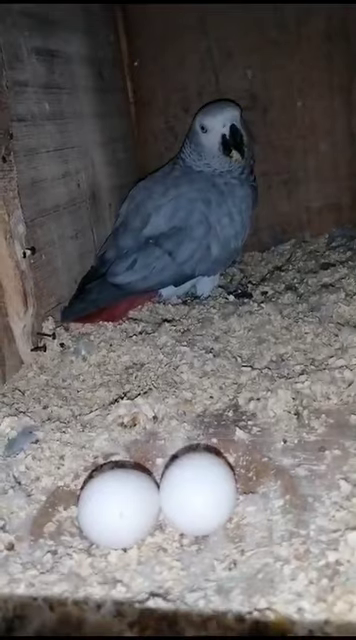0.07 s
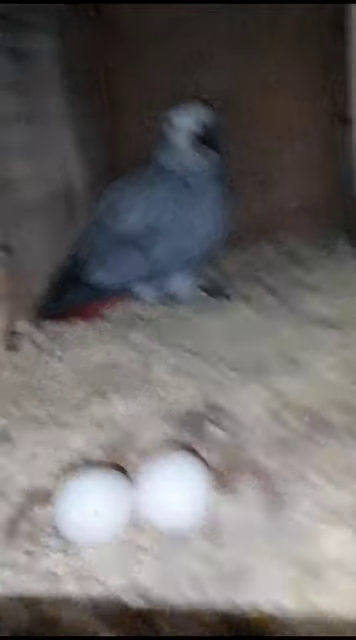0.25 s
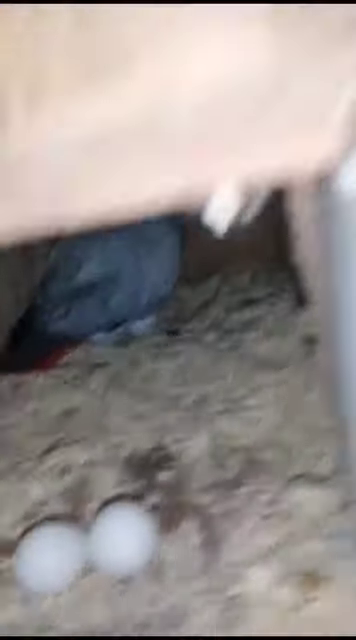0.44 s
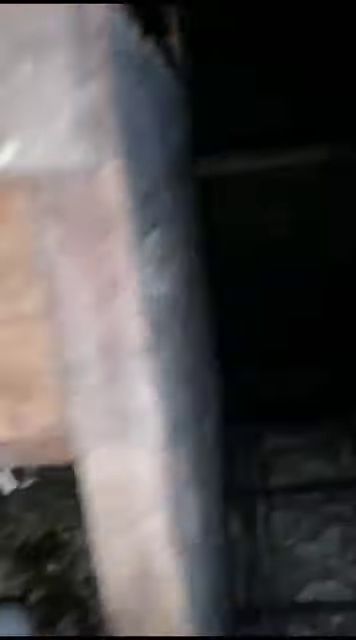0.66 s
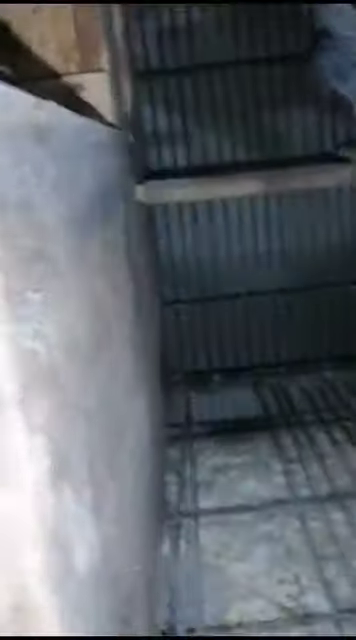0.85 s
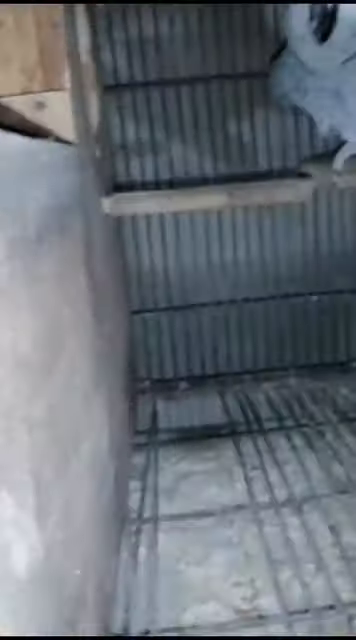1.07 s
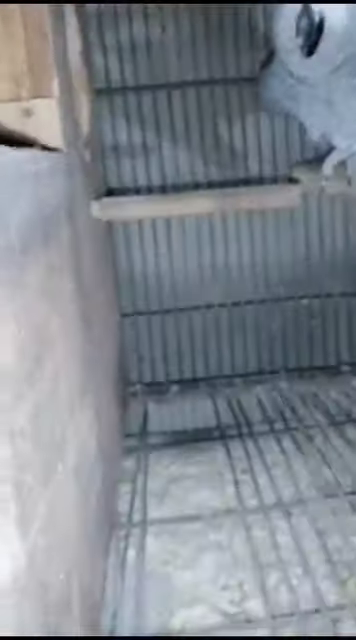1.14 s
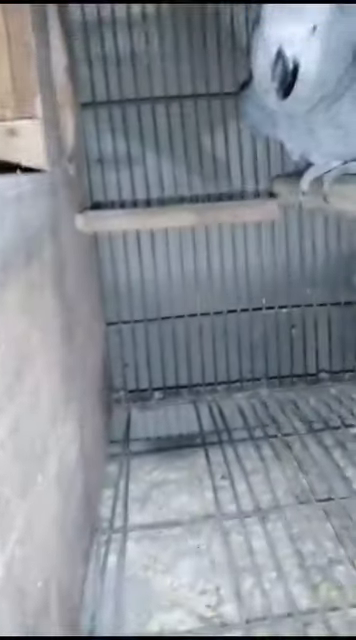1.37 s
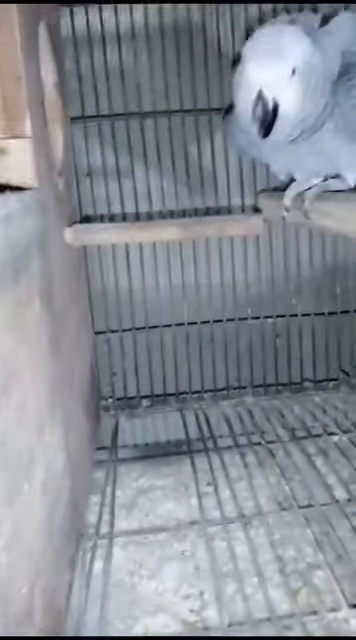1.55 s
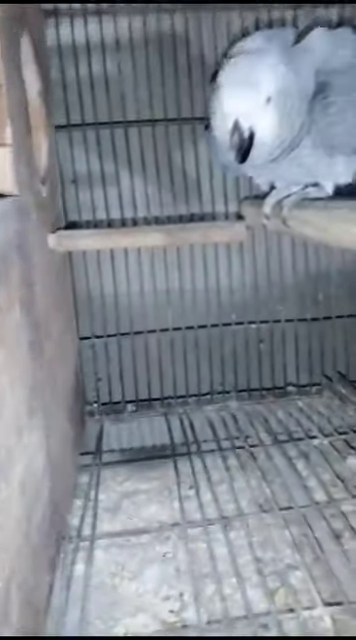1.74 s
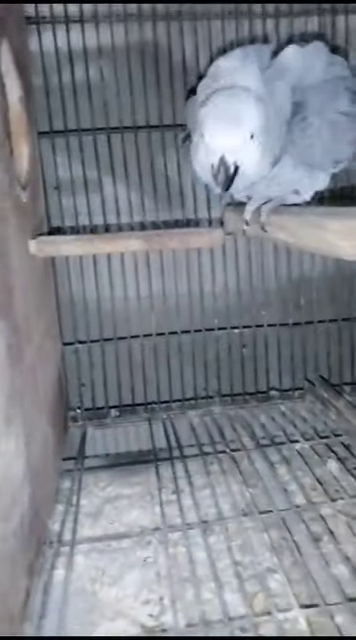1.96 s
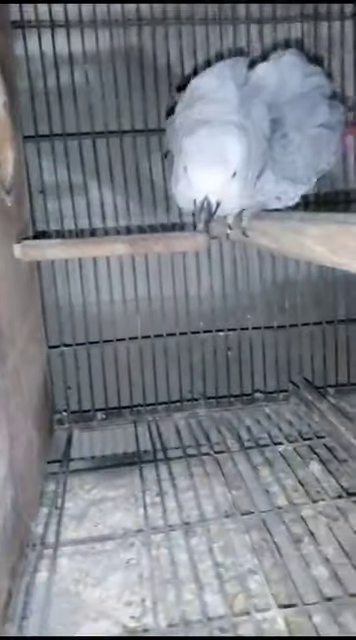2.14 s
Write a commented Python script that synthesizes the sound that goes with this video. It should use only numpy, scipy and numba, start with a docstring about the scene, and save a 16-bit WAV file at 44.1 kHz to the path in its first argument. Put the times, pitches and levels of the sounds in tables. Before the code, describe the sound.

A grey parrot growls once, close to the microphone in a small indoor aviary. A soft buzz breaks into a long harsh rasp and ends in a low rattling croak, with slight echo and a faint hum.

```python
"""A grey parrot growls once in a small indoor aviary, close to a hand-held phone.
A soft buzz breaks into a long harsh rasp and ends in a low rattling croak.
Uneven syrinx pulses ring the throat, at times in clear tones, while air tears through it.
Cage walls echo the call over a faint hum."""
import sys
import numpy as np
from scipy import signal
from scipy.fft import rfft, irfft
from scipy.io import wavfile
from scipy.ndimage import uniform_filter1d, map_coordinates
from numba import njit

SR = 44100
rng = np.random.default_rng(int(sys.argv[2]) if len(sys.argv) > 2 else 0)


def transcribe(u):
    """Save the signal u as a 16-bit wav file named by the first command-line argument.

    u: samples, shape (n,) or (channels, n), limited to [-1, 1]; the rate is SR.
    q: integer samples, one column per channel.
    """
    v = np.clip(np.atleast_2d(u).T, -1, 1)
    q = np.round(v * 32767).astype(np.int16)
    wavfile.write(sys.argv[1], SR, q)


N = 97020


def growl(start_s=.17, attack_s=.04, break_s=.218, stop_s=1.946, release_s=.007):
    """Syrinx pulses and puffs of air sound low harmonics, ring mouth and throat, and drive the rasp."""
    # Each row: time in seconds, syrinx pitch in Hz.
    pitch_hz = [(.22, 223), (.3, 231), (.32, 242.5), (.47, 258.5), (.6, 245.7), (.665, 234.5), (.8, 234),
                (.888, 229.5), (.99, 230), (1.096, 234), (1.35, 235.5), (1.72, 230.5), (1.81, 223),
                (1.84, 226)]
    # Each row: time in seconds, pulse unevenness from 0 to 1.
    roughness = [(.2, .75), (.42, .7), (.58, .65), (.7, .3), (.95, .4), (1.5, .4), (1.95, .45)]
    # Each row: time in seconds, then relative levels in dB of low harmonics, mouth, throat, rasp.
    levels = [(.16, -46, -55, -35, -62), (.205, -36, -52, -13, -33), (.22, -31, -37, -18.5, -33),
              (.275, -34, -27, -19.5, -28), (.31, -33, -23, -18, -27), (.345, -37.5, -29, -20.5, -24.5),
              (.39, -33.5, -31, -15.5, -25.5), (.53, -35, -30, -19.5, -24.5), (.56, -36.5, -30, -17, -26),
              (.635, -39, -28, -20.5, -25.5), (.68, -37, -23.5, -23.5, -25), (.78, -37, -23.5, -32.5, -25),
              (.89, -37.5, -29.5, -39, -26), (1.06, -35.5, -24.5, -29, -23.5),
              (1.35, -38.5, -27.5, -41.5, -24.5), (1.65, -40, -22.5, -31.5, -25),
              (1.8, -36, -23.5, -34, -26.5), (1.88, -35, -24.5, -27, -25.5),
              (1.945, -40.5, -32.5, -33, -26.5)]
    # Each row: frequency in Hz, gain of the low harmonics in dB.
    low_shape = [(200, -46.5), (470, -16.5), (590, -36), (685, -3.5), (780, -30), (910, 2.5), (1030, 4.5),
                 (1170, 0.5), (1290, 5), (1410, -5.5), (1640, -9), (1850, 6), (2100, -4.5), (2530, 5),
                 (2800, -0.5), (3250, -4), (4200, -16.5), (9000, -66.5)]
    # Each row: time in seconds, throat resonance in Hz.
    throat_hz = [(.22, 2062), (.32, 2100), (.48, 2196), (.62, 2114), (.9, 2090), (1.3, 2054), (1.95, 2090)]
    t, rough = np.arange(N) / SR, curve(roughness)
    low_db, mouth_db, throat_db, rasp_db = (curve(levels, k) for k in range(1, 5))
    uneven, even, phase = syrinx(curve(pitch_hz) * (1 + .005 * walk(45)), rough)
    puffs = unit((1 + np.exp(-phase)) * rng.standard_normal(N))
    drive = uneven + undb(-11) * rough * puffs
    low = unit(colour(even + undb(-16) * puffs, low_shape)) * undb(low_db + 1.6 * walk(49.66))
    mouth = resonance(drive + undb(-4) * puffs, hz=1648, width_hz=720) * undb(mouth_db - 7)
    throat = resonance(drive, curve(throat_hz), width_hz=323)
    throat *= undb(throat_db - 6.5 + .7 * walk(70.06))
    tones = clear_tones(phase)
    jet = puffs + undb(-11) * uneven + undb(-14) * even
    rasp = beak_rasp(jet) * undb(rasp_db - 1.5)
    harsh = butterworth(mouth + throat + rasp, "high", hz=1300, order=8)
    harsh *= undb(-7.5 * np.clip((break_s - t) / .0017, 0, 1))  # held down until the break
    gate = np.clip((t - start_s) / attack_s, 0, 1) * np.exp(-np.maximum(t - stop_s, 0) / release_s)
    return gate * (low + harsh + tones)


def syrinx(hz, rough, jitter_s=.000039):
    """One pulse a cycle, uneven in time and size; returns two trains and the phase in cycles."""
    t, phase = np.arange(N) / SR, np.cumsum(hz) / SR
    times = np.interp(np.arange(1, int(phase[-1])), phase, t)
    slip, strength = rng.standard_normal((1000, 2))[:len(times)].T * np.interp(times, t, rough)
    uneven = clicks(times + jitter_s * slip, undb(2 * strength))
    even = clicks(times + 1.6 * jitter_s * slip, undb(1.8 * strength))  # evener in size, looser in time
    return unit(uneven), unit(even), phase % 1


def beak_rasp(jet):
    """Air rasps and whistles through the bright resonances of throat and open beak."""
    # Each row: time in seconds, four resonance centres in Hz.
    centres_hz = [(.24, 3370, 3874, 5016, 6530), (.5, 3540, 4186, 5280, 6980),
                  (.66, 3900, 4290, 5030, 6810), (.77, 4000, 4620, 5420, 7200),
                  (.85, 3250, 4400, 5400, 7130), (1.08, 3221, 4450, 5070, 7100),
                  (1.37, 3310, 4450, 5290, 6860), (1.65, 3590, 4090, 5146, 7130),
                  (1.86, 3530, 3836, 5075, 6800)]
    # Each row: width of one resonance in Hz, its gain in dB.
    bands = [(200, -1), (220, 1), (340, 7), (380, 9)]
    # Each row: frequency in Hz, gain of the air noise in dB.
    air_shape = [(300, -74.5), (700, 15.5), (1100, -26), (1550, -0.5), (2000, 1.5), (2500, 2.5),
                 (2950, -6.5), (3350, 1), (4000, -5), (4500, 1), (5300, -1), (6100, -8), (7200, -9),
                 (8300, -17.5), (9200, -15), (10300, -26.5), (12000, -20), (13300, -29.5), (15000, -30)]
    # Each row: time in seconds, ringing of the lower three resonances in dB relative to the air noise.
    whistle_db = [(.25, -18, -14, -14), (.4, -16, -6, -9), (.6, -14, -8, -10), (.77, -20, -13, -5),
                  (.85, -7, -8, -9), (1, -9, -17, -14), (1.35, -16, -15, -4.5), (1.7, -15, -12, -8),
                  (1.9, -13, -12, -4.5)]
    air = colour(jet, air_shape)
    peaks = sum(undb(db) * svf(air, curve(centres_hz, k), float(width_hz))
                for k, (width_hz, db) in enumerate(bands, 1))
    whistle = np.zeros(N)
    for k in range(1, 4):
        ring = resonance(rng.standard_normal(N), curve(centres_hz, k), width_hz=150)
        whistle += ring * undb(curve(whistle_db, k))
    return unit(air + peaks) + whistle


def clear_tones(phase, throat_harmonic=9, mouth_harmonic=7, wander_rad=.45):
    """Harmonics near the throat and mouth resonances ring clear, in uneven swells."""
    # Each row of both: time in seconds, tone level in dB.
    throat_db = [(0.211, -50), (.235, -36), (.275, -29), (0.318, -24), (.345, -49), (.58, -42), (.635, -33),
                 (.73, -31), (.87, -50), (1.001, -34.5), (1.09, -45), (1.151, -31.5), (1.3, -39),
                 (1.376, -31.5), (1.41, -40.5), (1.485, -30.5), (1.53, -41), (1.59, -30.5), (1.68, -34.5),
                 (1.83, -38.5), (1.88, -37), (1.945, -35)]
    mouth_db = [(.63, -64), (.67, -36), (.82, -34.5), (.88, -55), (1.6, -36), (1.7, -45)]
    tones = np.zeros(N)
    for harmonic, levels in (throat_harmonic, throat_db), (mouth_harmonic, mouth_db):
        wave = np.sin(2 * np.pi * harmonic * phase + wander_rad * walk(130))
        tones += unit(wave * undb(walk(90))) * undb(curve(levels))
    return tones


def buzz(pitch_hz=238, air_db=-7):
    """Rough syrinx pulses and breath make the soft, dull lead-in."""
    # Each row: frequency in Hz, gain in dB.
    shape = [(100, -7.5), (236, -19), (470, 2), (700, -10.5), (950, 0), (1200, 2), (1420, 8), (1680, -9.5),
             (2100, 4.5), (2400, -4.5), (2900, -26), (7000, -29.5), (12000, -83)]
    # Each row: time in seconds, level in dB.
    levels = [(0, -85), (.06, -56.5), (.11, -44), (.2, -36), (.26, -41), (.36, -56), (.6, -110)]
    pulses = syrinx(pitch_hz * (1 + .005 * walk(28.8)), rough=np.full(N, .99))[0]
    breath = undb(air_db) * rng.standard_normal(N)
    return unit(colour(pulses + breath, shape)) * undb(curve(levels))


def croak(ring_s=.007, gurgle_start_s=1.97, rise_s=.1, gurgle_per_s=330):
    """Slow separate pulses, each with a short rough ring, over a swelling gurgle of weak ones."""
    # Each row: time in seconds, relative pulse level in dB.
    strong_pulses = [(2.015, -3), (2.029, 2), (2.075, 1.5), (2.081, 5.5), (2.099, 5), (2.118, 6.5),
                     (2.143, 2.5), (2.159, 8), (2.174, -0.5), (2.188, 5)]
    # Each row: frequency in Hz, gain in dB.
    shape = [(120, -16), (230, 2), (300, -8), (410, 3), (550, -9.5), (1100, -4.5), (1650, 11.5), (2200, -4),
             (2750, -1.5), (5500, -45), (7300, -13.5), (8500, -36)]
    times, db = np.array(strong_pulses).T
    pulses = clicks(times, undb(db))
    fade = np.exp(-np.arange(N) / SR / ring_s)
    ring = signal.fftconvolve(pulses, fade / np.linalg.norm(fade))[:N] * rng.standard_normal(N)
    gaps, sizes = rng.random((120, 2)).T
    age_s = np.cumsum(2 * gaps / gurgle_per_s)
    at_s = gurgle_start_s + age_s
    gurgle = clicks(at_s, sizes * np.minimum(age_s / rise_s, 1) * (at_s < N / SR))
    return colour(undb(-13.5) * (pulses + undb(-3) * ring) + undb(-11) * gurgle, shape)


def rustle(peak_s=.075, spread_s=.035, level_db=-56):
    """A faint brush of hiss before the growl."""
    swell = np.exp(-((np.arange(N) / SR - peak_s) / spread_s) ** 2)
    return undb(level_db) * swell * resonance(rng.standard_normal(N), hz=6400, width_hz=3000)


def cage_reflections(x, side, sway_s=.00006):
    """Nearby surfaces reflect the call; the delays sway as the hand moves the phone."""
    # Each row: left delay in seconds, right delay in seconds, gain in dB.
    surfaces = [(.0023, 0.0044, -13.5), (.0052, 0.0082, -4.5), (.0079, 0.0106, -9)]
    return sum(undb(row[2]) * delayed(x, row[side] + sway_s * walk(4.34)) for row in surfaces)


def room_echoes(x, t60_s=.38, gain_db=-14):
    """Dense reflections die away in the aviary."""
    # Each row: frequency in Hz, relative gain in dB.
    shape = [(200, -36), (900, 4.5), (1600, -2), (2100, 12.5), (2600, 1)]
    t = np.arange(N // 2) / SR
    tail = rng.standard_normal(N // 2) * undb(-60 * t / t60_s) * (t > .001)
    return undb(gain_db) * colour(signal.fftconvolve(x, tail / np.linalg.norm(tail))[:N], shape)


def background(split_hz=400, bass_side_db=-14):
    """Near-centred rumble and hum under a wide faint hiss; all sink during the growl."""
    # Each row: frequency in Hz, noise gain in dB.
    shape = [(25, -9), (55, -2), (80, -8.5), (300, -15), (700, -13.5), (1000, -4), (1500, -22), (2200, -17),
             (3200, -27), (15000, -45.5)]
    # Each row: time in seconds, bass level in dB, treble level in dB.
    levels = [(0, -48, -41), (.05, -53, -55), (.14, -46, -52), (.23, -47.5, -51), (.3, -61, -52.5),
              (.8, -66, -53.5), (1.92, -71, -57), (2.05, -58, -47.5), (2.2, -49.5, -47)]
    # Each row: frequency in Hz, level in dB relative to the rumble.
    hum_tones = [(57, -8), (237, -3)]
    t, polarity = np.arange(N) / SR, np.array([[1], [-1]])
    noises = [colour(rng.standard_normal(N), shape) for _ in range(2)]
    low_mid, low_side = (unit(butterworth(x, "low", split_hz)) for x in noises)
    high_mid, high_side = (unit(butterworth(x, "high", split_hz)) for x in noises)
    hum = sum(undb(db) * unit(np.sin(2 * np.pi * hz * t + .31 * walk(9.5))) for hz, db in hum_tones)
    bass = low_mid + hum + undb(bass_side_db) * polarity * low_side
    treble = (high_mid + polarity * high_side) / np.sqrt(2)
    return bass * undb(curve(levels, 1)) + treble * undb(curve(levels, 2))


def undb(db):
    """Decibels to gain."""
    return 10 ** (np.asarray(db) / 20)


def unit(x):
    """Scale to rms 1."""
    return x / np.sqrt(np.mean(x ** 2))


def curve(table, column=1):
    """One column of a time table at every sample."""
    rows = np.array(table, float)
    return np.interp(np.arange(N) / SR, rows[:, 0], rows[:, column])


def walk(rate_hz):
    """Smooth random wander of rms 1."""
    hold = max(int(SR / rate_hz), 1)
    steps = np.repeat(rng.standard_normal(N // hold + 1), hold)
    return unit(uniform_filter1d(steps, hold)[:N])


def clicks(times_s, sizes):
    """Impulses shared between neighbouring samples."""
    at = np.clip(times_s * SR, 0, N - 2)
    i = at.astype(int)
    return np.bincount(i, sizes * (1 - at + i), N) + np.bincount(i + 1, sizes * (at - i), N)


def colour(x, points, power=1, size=4096):
    """Minimum-phase filter through (Hz, dB) points; power scales the dB."""
    hz, db = np.array(points, float).T
    shape = np.interp(np.log(np.arange(size // 2 + 1) * SR / size + 1), np.log(hz), db)
    cepstrum = irfft(np.log(undb(shape * power)))
    cepstrum[1:size // 2] *= 2
    cepstrum[size // 2 + 1:] = 0
    return signal.fftconvolve(x, irfft(np.exp(rfft(cepstrum))))[:N]


def butterworth(x, kind, hz, order=4):
    """Low-pass or high-pass."""
    return signal.sosfilt(signal.butter(order, hz, kind, fs=SR, output="sos"), x)


@njit
def svf(x, hz, width_hz):
    """Band-pass with a moving centre, gain 1 there."""
    y, band, low = np.empty(len(x)), 0., 0.
    for i in range(len(x)):
        g, damping = np.tan(np.pi * hz[i] / SR), width_hz / hz[i]
        v = (band + g * (x[i] + 1e-18 - low)) / (1 + g * (g + damping))
        band, low, y[i] = 2 * v - band, low + 2 * g * v, damping * v
    return y


def resonance(x, hz, width_hz):
    """The band-pass applied twice, scaled to rms 1."""
    centre = hz * np.ones(N)
    return unit(svf(svf(x, centre, float(width_hz)), centre, float(width_hz)))


def delayed(x, seconds):
    """Steady or moving delay."""
    return map_coordinates(x, [np.arange(N) - seconds * SR])


def scene():
    """The bird is nearer the left microphone; each side has its own colour and reflections."""
    # Each row: time in seconds, lag of the right microphone in seconds as the phone turns.
    right_lag_s = [(.18, 0.000023), (.26, 0.00052), (1.94, 0.0004763), (2.02, 0.00018)]
    # Each row: frequency in Hz, left minus right in dB.
    balance = [(60, 17.5), (230, 19), (450, 0), (700, 19.5), (930, 10), (1170, -14), (1400, -1),
               (1650, -4.5), (2100, -6), (2550, 7.5), (3500, -5), (4500, -4), (5300, -2.5), (6800, 0),
               (8200, 18), (9500, 8), (12000, 0), (15000, 11)]
    bird = growl() + buzz() + croak() + rustle()
    right = delayed(bird, curve(right_lag_s) + .00002 * walk(2.805))
    channels = []
    for side, (direct, share) in enumerate([(bird, .5), (right, -.5)]):
        heard = direct + cage_reflections(bird, side) + room_echoes(bird)
        channels.append(colour(heard, balance, share))
    return np.array(channels) + background()


def record(dry):
    """The phone cuts the treble above 15.5 kHz."""
    return signal.sosfilt(signal.ellip(10, .2, 80, 15500, fs=SR, output="sos"), dry)


dry = scene()
out = record(dry)
transcribe(out)
```